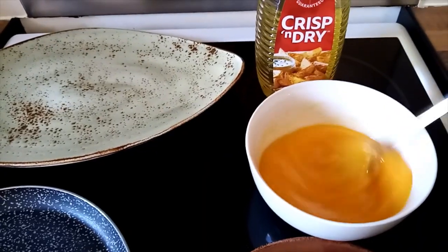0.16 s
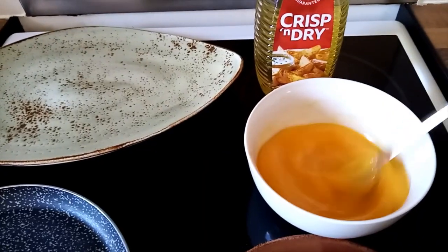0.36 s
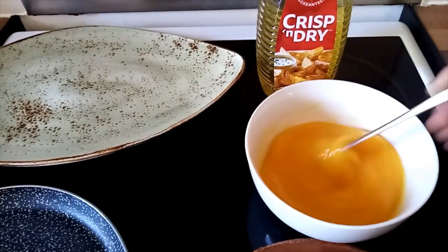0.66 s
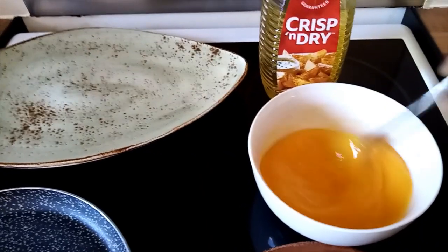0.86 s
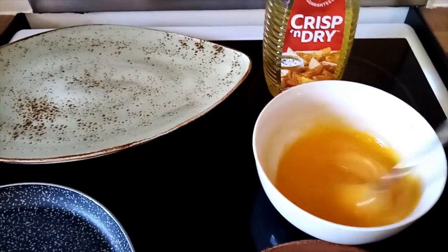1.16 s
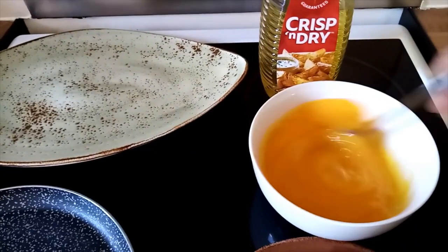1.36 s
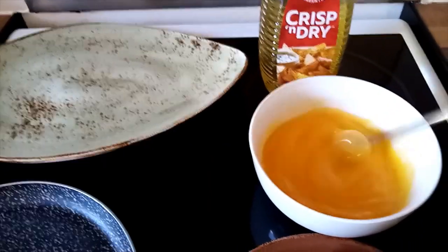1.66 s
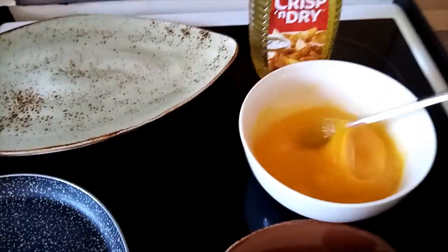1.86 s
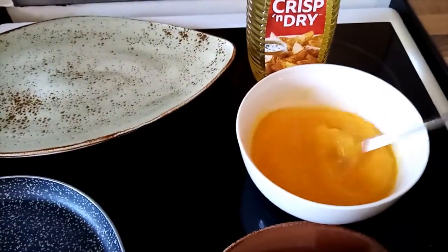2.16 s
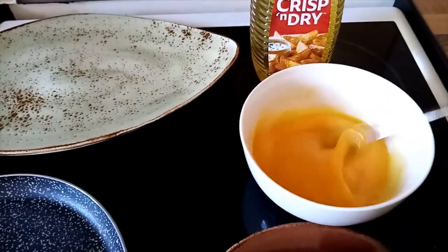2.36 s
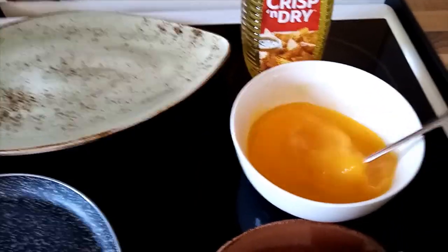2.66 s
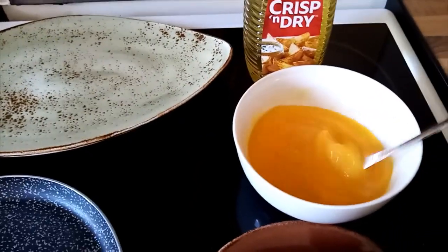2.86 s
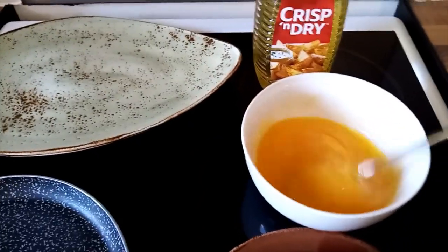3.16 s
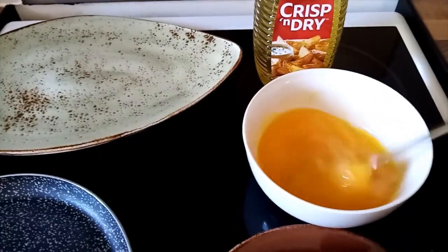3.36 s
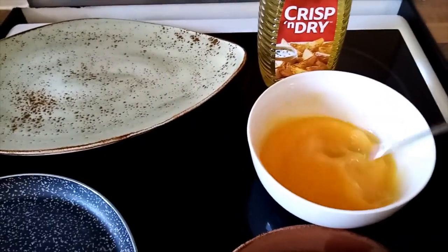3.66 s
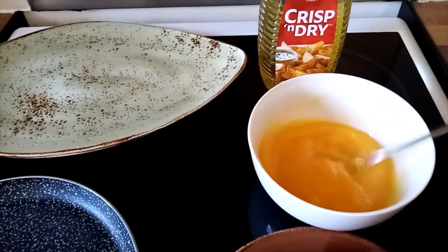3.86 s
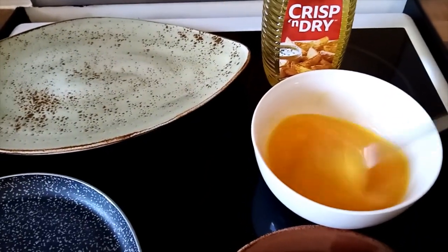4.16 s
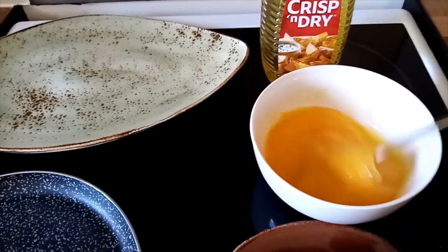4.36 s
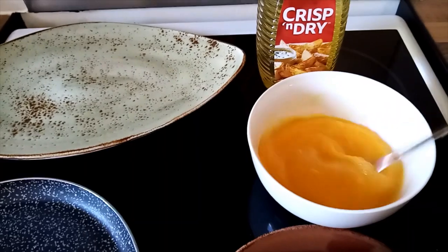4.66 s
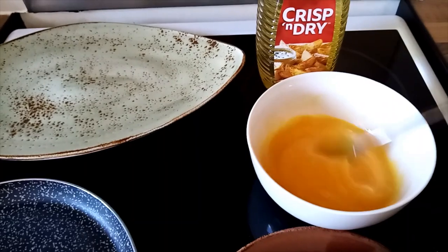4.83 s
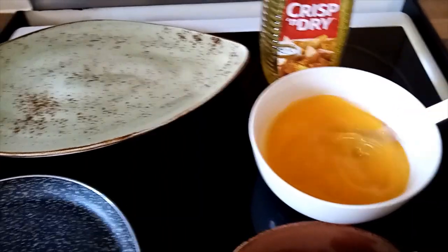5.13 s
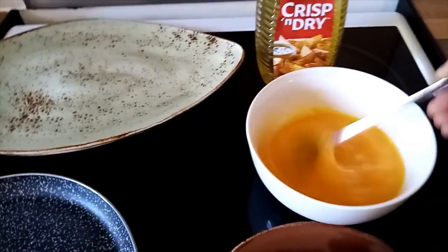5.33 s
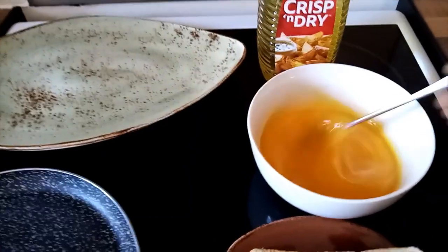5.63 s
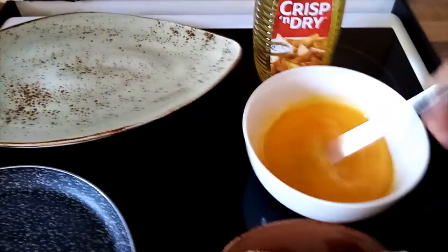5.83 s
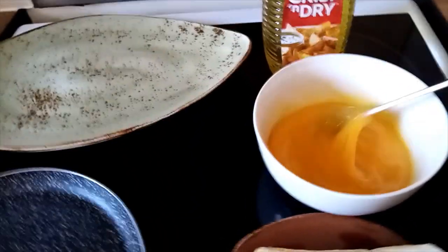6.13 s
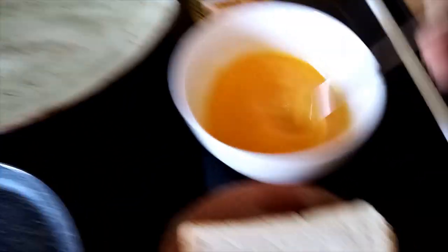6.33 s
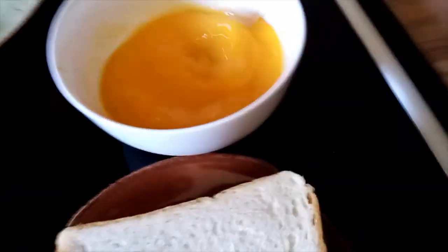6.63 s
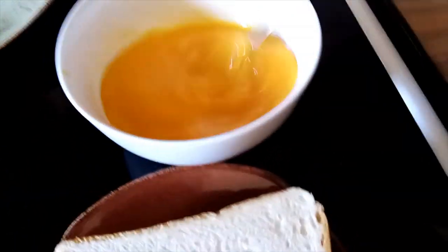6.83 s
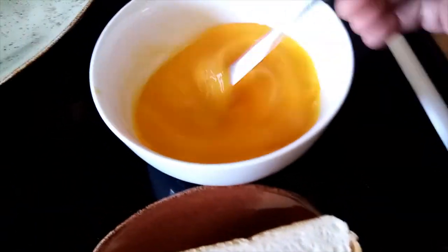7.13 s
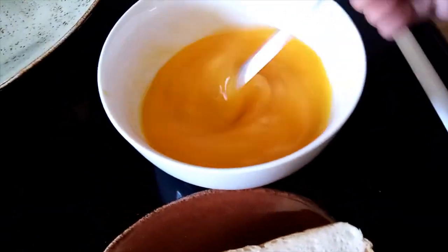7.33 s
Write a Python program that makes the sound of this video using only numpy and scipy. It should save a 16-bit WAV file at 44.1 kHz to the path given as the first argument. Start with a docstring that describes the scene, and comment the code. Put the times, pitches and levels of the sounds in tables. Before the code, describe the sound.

A spoon taps and scrapes rapidly around a ceramic bowl of beaten egg, with wet little plops and a faint low rumble in a kitchen.

```python
"""Eggs beaten in a ceramic bowl

A spoon strikes the bowl (damped modes and noise bursts), scrapes its glaze (grit, hiss and a gliding band)
and closes air pockets in the egg (rising sines). A glass hob rumbles, a hard kitchen echoes, faint air noise
lies below. A phone listens through two ports, one at each end; its noise suppressor opens on loud sounds
and ducks just ahead of steep jumps in level.
"""
import sys
import numpy as np
from scipy import signal
from scipy.fft import rfft, irfft, next_fast_len
from scipy.io import wavfile
from scipy.ndimage import uniform_filter1d, minimum_filter1d

SR = 44100
rng = np.random.default_rng(int(sys.argv[2]) if len(sys.argv) > 2 else 0)


def unload_wav(signal):
    """Save mono or channel-first audio to the path in sys.argv[1] as 16-bit WAV at rate SR, clipped to [-1, 1]."""
    wavfile.write(
        sys.argv[1],
        SR,
        np.round(np.clip(np.atleast_2d(signal).T, -1, 1) * 32767).astype(np.int16),
    )


N = 330309   # length in samples


def from_db(db):
    """Decibel law: amplitude gain of a level in dB."""
    return 10 ** (np.asarray(db) / 20)


def rms_one(x):
    """Power normalisation: scaled to rms 1."""
    return x / np.sqrt(np.mean(x ** 2) + 1e-20)


def at_hz(points, hz):
    """Logarithmic frequency scale: a table interpolated along log pitch."""
    table = np.array(points)
    return np.interp(np.log(hz), np.log(table[:, 0]), table[:, 1])


def shaped(x, spectrum):
    """Spectral filtering: noise weighted by a spectrum in the frequency domain, then set to rms 1."""
    size = next_fast_len(x.shape[-1])
    hz = np.maximum(np.fft.rfftfreq(size, 1 / SR), 1)
    weighted = rfft(x, size) * from_db(at_hz(spectrum, hz))
    return rms_one(irfft(weighted, size)[..., :x.shape[-1]])


def fade(x, tau_s):
    """Exponential relaxation: a click becomes a falling envelope of the same height."""
    return signal.lfilter([1], [1, -np.exp(-1 / (tau_s * SR))], x + 1e-18)


def ring(clicks, hz, t60_s):
    """Damped resonance: a unit click sets a decaying sine of initial height 1 ringing."""
    radius = from_db(-60 / (t60_s * SR))
    angle = 2 * np.pi * hz / SR
    return signal.lfilter([0, np.sin(angle)], [1, -2 * radius * np.cos(angle), radius ** 2], clicks + 1e-18)


def train(start_s, level_db):
    """Impulse excitation: clicks of given levels at given times."""
    clicks = np.zeros(N)
    places = np.minimum((np.asarray(start_s) * SR).astype(int), N - 1)
    clicks[places] = from_db(level_db)
    return clicks


def grit(per_s, spread_db):
    """Random impulse process: uneven clicks of the spoon's edge catching on the glaze; rms 1."""
    sizes = from_db(spread_db * np.minimum(rng.exponential(1, N), 4))
    signed = sizes * rng.choice([-1, 1], N)
    return rms_one(signed * (rng.random(N) < per_s / SR))


def wander(per_s):
    """Random modulation: normal values of spread 1, per_s of them a second, joined by straight lines."""
    steps = rng.standard_normal(int(N / SR * per_s) + 2)
    return np.interp(np.arange(N) * per_s / SR, np.arange(len(steps)), steps)


def favour(hz, favoured_hz, most_db):
    """Selective excitation: loss in dB of a mode away from the favoured pitch, up to a limit."""
    db_per_octave2 = 181
    return np.minimum(db_per_octave2 * np.log2(hz / favoured_hz) ** 2, most_db)


# blows of the spoon on the bowl: start_s, strength_db, low_modes_db (relative), favoured_low_pitch_hz,
# middle_modes_db (relative), favoured_middle_pitch_hz
SPOON_BLOWS = [(.086, -36.5, -0.5, 970, 6.5, 2230), (.317, -34, 12, 1005, -8, 3200),
               (.409, -43.5, 3.5, 980, -14, 1660), (.54, -35.5, -6.5, 1060, -5, 1780),
               (.659, -45, 13.5, 670, 4.5, 1890), (.765, -34.5, 7.5, 774, -4, 3240),
               (.886, -45.5, 14, 917, 2.5, 1780), (1.352, -33, 7.5, 1057, 3, 1720),
               (1.641, -34, -1, 990, 8, 2070), (1.877, -29.5, 3, 1090, -14, 3000),
               (1.884, -46.5, 11, 1030, -14, 3070), (2.108, -73, 6, 1220, 18, 2820),
               (2.119, -34.5, 2.5, 1213, 7.5, 1960), (2.192, -54.5, 15, 1220, 6, 1830),
               (2.363, -34, 9.5, 884, 8.5, 2200), (2.414, -47, 9, 1227, 8.5, 1670),
               (2.59, -33, 7, 1274, -2, 2050), (2.684, -48, 5, 674, 4, 2680),
               (2.807, -30.5, 7.5, 937, -1.5, 1990), (2.969, -52, -6, 1000, 2, 2380),
               (2.997, -59.5, 23, 820, 12, 1845), (3.018, -29, 1, 1250, 11.5, 1690),
               (3.06, -38.5, 2.5, 1120, 8, 1770), (3.232, -38, 7, 1140, 7, 1693),
               (3.42, -29, 9.5, 932, 7.5, 1900), (3.625, -31, 4.5, 1170, 5, 3400),
               (3.791, -46, -23, 1060, -19, 2330), (3.831, -37.5, 4, 1200, 4, 3200),
               (3.855, -52.5, -14, 1250, 12, 1830), (4.02, -26.5, -0.5, 955, -3.5, 1950),
               (4.22, -34.5, 4, 1210, 14.5, 1710), (4.257, -43, 0, 1060, 4.5, 1720),
               (4.418, -33.5, 2.5, 1240, 5, 2160), (4.616, -31.5, 3, 1170, -2.5, 1920),
               (4.638, -42, 5, 1230, 14, 2090), (4.834, -40, 9, 1020, -2.5, 2900),
               (4.855, -39, 4, 950, -1.5, 2830), (5.082, -35, 2.5, 980, 7, 1640),
               (5.155, -39, -2, 1070, -4, 3060), (5.346, -41.5, 1.5, 1060, 7.5, 1670),
               (5.608, -39.5, 1.5, 1206, 3, 2460), (5.869, -29.5, -8, 1080, -3.5, 2160),
               (6.15, -34, -2, 1040, 1, 1750), (6.38, -41.5, -3, 1110, 6.5, 2070),
               (6.557, -44, 5.5, 1080, 12, 2090), (6.78, -55, 23, 804, -5, 1890),
               (6.785, -40.5, 11.5, 1100, 8.5, 2040), (6.868, -41.5, 6, 1180, 6, 1900),
               (6.999, -37.5, 15.5, 912, 9, 2060), (7.216, -35, 2.5, 1080, 3, 3100),
               (7.297, -37.5, -9, 805, -1, 1900), (7.422, -29.5, -8, 1060, -1.5, 2150)]
# modes of the bowl, damped by the egg: pitch_hz, level_db (relative), t60_s, left_minus_right_db
BOWL_MODES = [(663, -9.5, 0.11, -18.5), (771, 3, 0.06, -5), (928, -4, 0.039, 1.5), (1010, 2, 0.087, 0.5),
              (1113, 7, 0.037, 2), (1233, 4, 0.057, 7.5), (1533, -2.5, 0.038, 14),
              (1733, 0.5, 0.023, -15.5), (1843, 4, 0.034, -3.5), (1919, 4, 0.04, -4),
              (2033, -2, 0.033, -16), (2160, -5, 0.02, 20), (2467, 4, 0.015, -16.5), (2719, 7.5, 0.032, 7),
              (3004, 3.5, 0.025, -19.5), (3978, 5, 0.031, -13), (4050, -28, 0.016, 15),
              (5914, 3.5, 0.013, 28), (6765, 2.5, 0.04, -25), (8240, 4, 0.0092, -18.5)]


def bowl(rub, rub_hz):
    """Modal synthesis: blows and rubbing drive one set of modes; the contact point decides which it favours."""
    middle_from_hz, high_from_hz = 1400, 3400
    high_modes_db = -10   # relative to the strength of any blow
    start_s, strength_db, low_db, low_hz, middle_db, middle_hz = np.transpose(SPOON_BLOWS)
    scatter = rng.normal(0, 1, (len(start_s), len(BOWL_MODES)))
    chatter = grit(per_s=1500, spread_db=3)
    out = np.zeros((2, N))
    for k, (hz, mode_db, t60_s, pan_db) in enumerate(BOWL_MODES):
        if hz < middle_from_hz:
            group_db = low_db - favour(hz, low_hz, most_db=16.5)
            rub_db = -37.0
        elif hz < high_from_hz:
            group_db = middle_db - favour(hz, middle_hz, most_db=12)
            rub_db = -30.5 - favour(hz, rub_hz, most_db=7.0)
        else:
            group_db = high_modes_db
            rub_db = -48
        blows = train(start_s, strength_db + group_db + mode_db - 3.0 + 2.27 * scatter[:, k])
        # the spoon skips after the first touch
        blows = blows + from_db(-26.5) * fade(blows, 0.0098) * chatter
        # the moving egg damps now this mode, now that one
        sliding = rub * from_db(rub_db) * from_db(mode_db + 3.6 * wander(per_s=22))
        # waves of egg break up the ringing
        broken = 0.74 + 0.68 * wander(per_s=120)
        ringing = broken * ring(blows + sliding, hz, t60_s)
        polarity = (-1) ** k
        out += polarity * ringing * from_db([[pan_db / 2], [-pan_db / 2]])
    return out


# main noise spectrum of the impact: pitch_hz, density_db (relative, per Hz)
CRACK_SPECTRUM = [(300, -10), (700, -12), (1500, 3.5), (3400, -0.5), (6200, 4.5), (8500, -1), (11000, -18),
                  (14000, -45), (16500, 2)]
# spectrum of its top sparkle: pitch_hz, density_db (relative, per Hz)
SPARKLE_SPECTRUM = [(7000, -39), (10000, -0.5), (13500, 4), (15500, 0.5), (17000, -14)]
# slow drift, also played by the hob: time_s, low_rumble_db, top_sparkle_db (relative to the blow)
SLOW_DRIFT = [(0.0, -59, -11.5), (.81, -60, -19.5), (1.2, -68.5, -32), (1.5, -64.5, -18), (3.09, -62, -14),
              (4.61, -61.5, -14), (5.2, -68, -24), (5.9, -67, -23), (6.4, -66, -11), (7.49, -60.5, -17.5)]


def crack():
    """Impact noise: steel on glaze gives a bright burst of a few ms, then the spoon chatters out."""
    start_s, strength_db = np.array(SPOON_BLOWS)[:, :2].T
    sparkle_db = np.interp(start_s, *np.array(SLOW_DRIFT)[:, [0, 2]].T)
    # each port faces another part of the burst, so their noises are only partly alike
    noise = rng.standard_normal(N) + 1.8 * rng.standard_normal((2, N))
    out = 0
    for level_db, spectrum in ((strength_db, CRACK_SPECTRUM), (strength_db + sparkle_db, SPARKLE_SPECTRUM)):
        clicks = train(start_s, level_db)
        burst = fade(clicks, 0.0022) - fade(clicks, 0.00084)
        chatter = fade(clicks, 0.013)
        envelope = from_db(10.0) * burst + from_db(2.5) * chatter
        out = out + envelope * shaped(noise, spectrum)
    return out


# strokes of the spoon along the glaze: middle_s, half_length_s, bowl_answer_db, favoured_pitch_hz,
# edge_hiss_db (relative to the answer)
GLAZE_STROKES = [(.01, 0.041, -43.5, 2000, -3), (0.11, 0.035, -53, 2400, -10.2),
                 (0.235, 0.14, -50.5, 1880, 2.2), (0.473, .11, -51, 2970, .2), (.602, 0.16, -60, 1890, 4.5),
                 (.702, 0.11, -53, 1810, -2.5), (.986, 0.091, -55, 1880, -5), (1.134, 0.12, -53, 2730, 0),
                 (1.182, 0.11, -52, 1817, -24.5), (1.451, 0.1, -50.5, 2080, -2.5),
                 (1.7, 0.08, -52.5, 2060, 1.5), (2.3, 0.22, -62, 2320, -12), (2.626, 0.087, -52, 1900, -13),
                 (3.485, 0.19, -63, 1880, -10), (3.769, 0.016, -55, 1950, 3), (4.654, 0.15, -51, 1970, -17),
                 (4.902, 0.12, -55, 2550, -12.5), (5.198, .12, -51, 2360, -16.5),
                 (5.461, 0.1, -50.5, 1950, -3.5), (5.725, 0.1, -51.5, 1877, 2),
                 (5.959, 0.094, -52, 1880, 1.5), (6.084, 0.04, -58, 2180, -30),
                 (6.241, 0.062, -55.5, 2040, 4.5), (6.452, 0.083, -52.5, 2190, -1),
                 (6.689, 0.081, -52, 2010, 3), (6.91, 0.065, -57, 2120, 9.5), (7.047, 0.14, -52, 1880, -12),
                 (7.139, 0.094, -57, 2720, 9), (7.335, 0.06, -44.5, 1970, -2.5)]


def each_stroke():
    """Moving contact: span, swell, gliding pitch and levels of every stroke."""
    # a stroke that skims the wall holds its pitch; a muffled one runs deep in the egg and sinks
    muffled_below_db, sink_octaves_per_db = -8, .025
    t = np.arange(N) / SR
    for middle_s, half_s, answer_db, hz, hiss_db in GLAZE_STROKES:
        span = slice(max(int((middle_s - half_s) * SR), 0), int((middle_s + half_s) * SR))
        along = (t[span] - middle_s) / half_s   # -1 to 1
        swell = np.cos(np.pi / 2 * along) ** 2
        sink_octaves = sink_octaves_per_db * max(muffled_below_db - hiss_db, 0)
        glide_hz = hz * 2 ** (-sink_octaves * np.clip(along, -.5, .5))
        yield span, swell, glide_hz, answer_db, hiss_db


def strokes():
    """Sliding friction: each stroke swells and fades while its favoured pitch follows the contact point."""
    resting_db = -65.5   # the spoon never quite leaves the glaze
    answer = np.full(N, from_db(resting_db))
    hiss = np.full(N, from_db(resting_db - 3))
    pitch_hz = np.full(N, 1900.)
    for span, swell, glide_hz, answer_db, hiss_db in each_stroke():
        # the louder stroke sets the pitch
        leads = from_db(answer_db) * swell > answer[span] / 2
        pitch_hz[span] = np.where(leads, glide_hz, pitch_hz[span])
        answer[span] += from_db(answer_db) * swell
        hiss[span] += from_db(answer_db + hiss_db) * swell
    return answer, pitch_hz, hiss


# spectrum of the scraping edge: pitch_hz, density_db (relative, per Hz)
SWISH_SPECTRUM = [(900, -10), (2000, -1), (3500, -6), (5500, 1), (7000, -5), (9500, -13.5), (16500, -25)]


def swish(level):
    """Band-modulated friction noise: hiss of the edge in third-octave patches that come and go."""
    rough_edge = grit(per_s=9000, spread_db=5.0) + 2.2 * rng.standard_normal((2, N))
    edge = shaped(rough_edge, SWISH_SPECTRUM)
    out = 0
    for low_hz in 1000 * 2 ** np.arange(0, 4, 1 / 3):
        band = signal.butter(1, [low_hz, low_hz * 2 ** (1 / 3)], "band", fs=SR, output="sos")
        patch = from_db(8.6 * wander(per_s=21))
        out = out + patch * signal.sosfilt(band, edge)
    return level * rms_one(out)


def gurgle():
    """Randomly modulated tone: the hollow behind the spoon sings as a narrow rough band gliding with each stroke."""
    gurgle_db = -0.5   # relative to the bowl's answer
    out = np.zeros(N)
    rough = wander(per_s=90)
    for span, swell, glide_hz, answer_db, _ in each_stroke():
        tone = np.sin(2 * np.pi * np.cumsum(glide_hz) / SR)
        out[span] += from_db(answer_db + gurgle_db) * swell * rough[span] * tone
    return out


# air pockets closing in the egg: start_s, level_db (of the envelope before its swell), pitch_hz (at the start)
AIR_POCKETS = [(0.044, -37, 747), (0.215, -40.5, 727), (0.631, -42, 1150), (0.979, -42, 966),
               (1.246, -43.5, 990), (1.302, -49, 815), (1.32, -39.5, 2520), (1.444, -44, 980),
               (1.958, -36.5, 690), (2.202, -35.5, 1160), (2.684, -36.5, 2610), (3.596, -44, 2470),
               (4.545, -46, 750), (4.977, -42, 1110), (5.201, -35.5, 1164), (5.456, -41, 765),
               (5.461, -37.5, 1136), (5.729, -35, 1150), (5.734, -40, 757), (6.07, -41, 1090),
               (6.257, -37.5, 1173), (6.274, -39.5, 750), (6.41, -41, 745), (6.464, -35.5, 1090),
               (6.542, -39.5, 1170), (6.706, -38.5, 807), (7.146, -38, 715)]
# spectrum of the egg washing back: pitch_hz, density_db (relative, per Hz)
SLOSH_SPECTRUM = [(250, -13), (600, -7.5), (900, -12), (1400, -9), (3000, -44)]


def plops():
    """Bubble resonance: each pocket swells in, rings briefly and rises in pitch; the egg sloshes back after it."""
    cycles_to_60_db_down = 69
    rise_per_s = 2.25   # share of the starting pitch gained per second
    out = np.zeros(N + SR // 5)
    t = np.arange(SR // 5) / SR
    for start_s, level_db, hz in AIR_POCKETS:
        start = int(start_s * SR)
        envelope = (1 - np.exp(-t / 0.00087)) * from_db(level_db - 60 * t * hz / cycles_to_60_db_down)
        cycles = hz * (t + rise_per_s * t ** 2 / 2)
        out[start:start + len(t)] += envelope * np.sin(2 * np.pi * cycles)
    clicks = train(*np.array(AIR_POCKETS)[:, :2].T)
    wash = fade(clicks, 0.016) - fade(clicks, 0.0016)
    slosh = shaped(grit(per_s=700, spread_db=2.0), SLOSH_SPECTRUM)
    return out[:N] + from_db(-7.0) * wash * slosh


# reverberation times of the kitchen: pitch_hz, t60_s
KITCHEN_DECAY = [(200, 0.46), (1000, 0.34), (4000, 0.38), (12000, 0.26)]


def kitchen(x):
    """Statistical reverberation: octave bands of noise, each dying at its own rate, form each port's echoes."""
    t = np.arange(int(.5 * SR)) / SR
    echoes = 0
    for low_hz in 130 * 2. ** np.arange(7):
        band = signal.butter(2, [low_hz, 2 * low_hz], "band", fs=SR, output="sos")
        t60_s = at_hz(KITCHEN_DECAY, low_hz * np.sqrt(2))
        envelope = (1 - np.exp(-t / 0.0032)) * from_db(-60 * t / t60_s)
        echoes = echoes + envelope * signal.sosfilt(band, rng.standard_normal((2, len(t))))
    echoes = echoes / np.sqrt(np.sum(echoes ** 2, axis=1, keepdims=True))   # unit energy
    return signal.fftconvolve(x[None], echoes, axes=1)[:, :N]


# spectrum of the glass plate: pitch_hz, density_db (relative, per Hz)
RUMBLE_SPECTRUM = [(18, -54), (30, -19), (100, -2.5), (124, 2), (152, -9.5), (186, 0), (231, -18.5),
                   (271, -2), (301, -14.5), (339, 2.5), (397, -17), (436, -7), (490, -16.5), (700, -13),
                   (910, -11.5), (1540, -120)]


def hob():
    """Structure-borne sound: the glass plate rumbles and swells after each blow, nearly alike at both ports."""
    start_s, strength_db = np.array(SPOON_BLOWS)[:, :2].T
    pushes = train(start_s, 0.72 * (strength_db + 37.5))
    swell = 1.264 + 3.4 * (fade(pushes, 0.029) - fade(pushes, 0.0019))
    drift_db = np.interp(np.arange(N) / SR, *np.array(SLOW_DRIFT)[:, :2].T)
    rumble_db = drift_db + 3.13 * wander(per_s=12)
    noise = rng.standard_normal(N) + 0.32 * rng.standard_normal((2, N))
    port_gains = from_db([[-1], [1]])
    return swell * from_db(rumble_db) * shaped(noise, RUMBLE_SPECTRUM) * port_gains


# spectrum of the air noise: pitch_hz, density_db (relative, per Hz)
AIR_SPECTRUM = [(290, -49), (500, -49), (1050, 25), (1380, 17), (1900, -33), (2260, 0), (6510, -4),
                (15100, -49), (16000, -17)]


def background():
    """Stationary noise: faint air noise, unrelated between the ports."""
    return from_db(-66.5) * shaped(rng.standard_normal((2, N)), AIR_SPECTRUM)


def scene():
    """Superposition: bowl, spoon and egg, their echoes, the hob and the air add up."""
    port_lag = 50   # samples by which the right port hears late
    answer, rub_hz, hiss = strokes()
    rub = answer * grit(per_s=5000, spread_db=4.0)
    near = bowl(rub, rub_hz) + crack() + swish(hiss) + gurgle() + plops()
    # arm and spoon keep moving, so the sound shifts between two echo patterns
    sway = 1.59 * wander(per_s=25)   # angle in radians
    mono = near.mean(axis=0)
    echoes = kitchen(mono * np.cos(sway)) + kitchen(mono * np.sin(sway))
    dry = near + from_db(-9) * echoes + hob() + background()
    dry[1] = np.roll(dry[1], port_lag)
    return dry


def suppressor(x):
    """Downward expansion with look-ahead: gain falls with the held level; a coming jump ducks the quiet before it."""
    threshold_db, release_db_per_s = -38.0, 110
    power = uniform_filter1d(np.mean(x ** 2, axis=0), size=220)
    level_db = 10 * np.log10(power + 1e-12)
    slope_db = release_db_per_s * np.arange(N) / SR
    held_db = np.maximum.accumulate(level_db + slope_db) - slope_db
    closing_db = 0.39 * np.minimum(held_db - threshold_db, 0)
    # highest level within the next 15 ms; only jumps above 30 dB duck
    coming_db = -minimum_filter1d(-level_db, size=661, origin=-330)
    duck_db = -.3 * np.maximum(coming_db - level_db - 30.0, 0)
    return x * from_db(uniform_filter1d(closing_db + duck_db, size=44))


def record(dry):
    """Port filtering: a dull left port and a bright right resonance; suppressor, then bass and top are cut."""
    dull = signal.butter(3, 8800, fs=SR, output="sos")
    left = signal.sosfilt(dull, dry[0])
    b, a = signal.iirpeak(15250, 25, fs=SR)
    right = dry[1] + from_db(8.5) * signal.lfilter(b, a, dry[1])
    gated = suppressor(np.array([left, right]))
    bass_cut = signal.butter(2, 70, "high", fs=SR, output="sos")
    top_cut = signal.cheby2(12, 60, 16400, fs=SR, output="sos")
    return signal.sosfilt(top_cut, signal.sosfilt(bass_cut, gated))


dry = scene()
out = record(dry)
unload_wav(out)
```